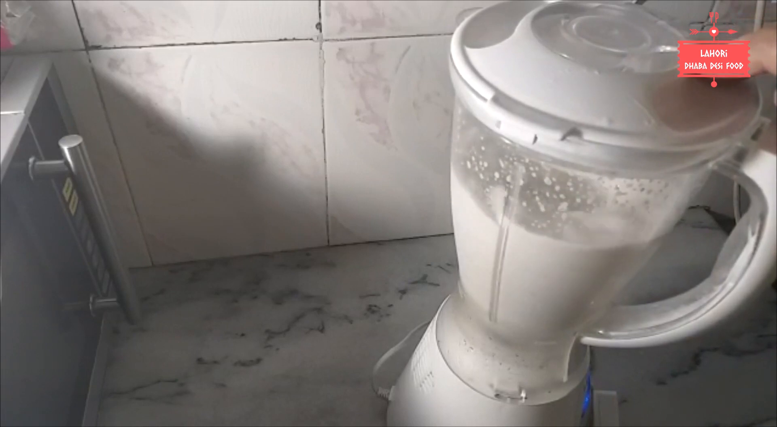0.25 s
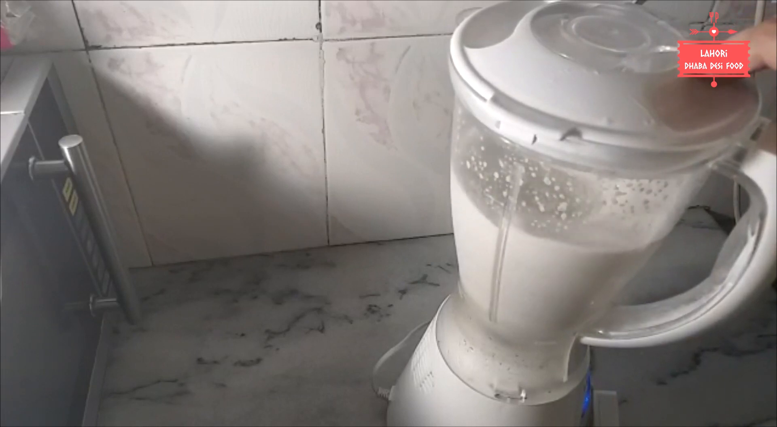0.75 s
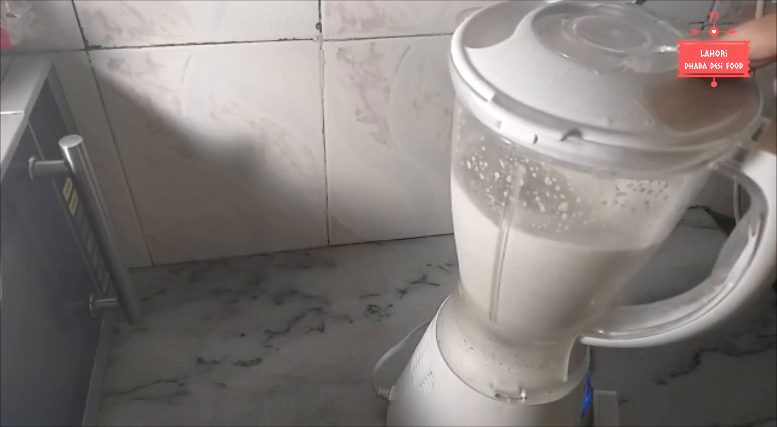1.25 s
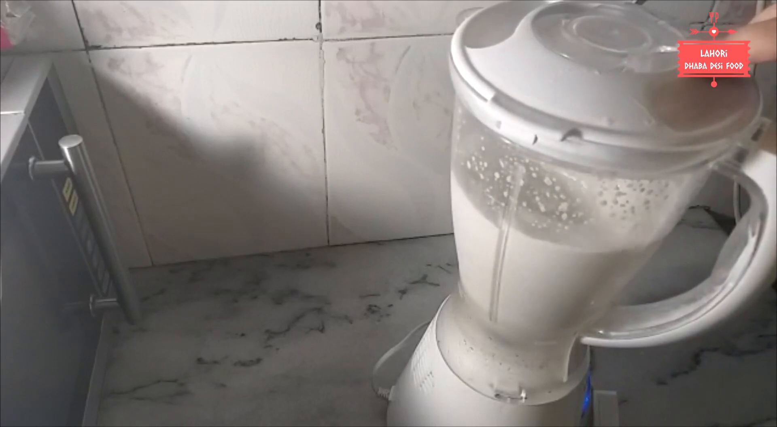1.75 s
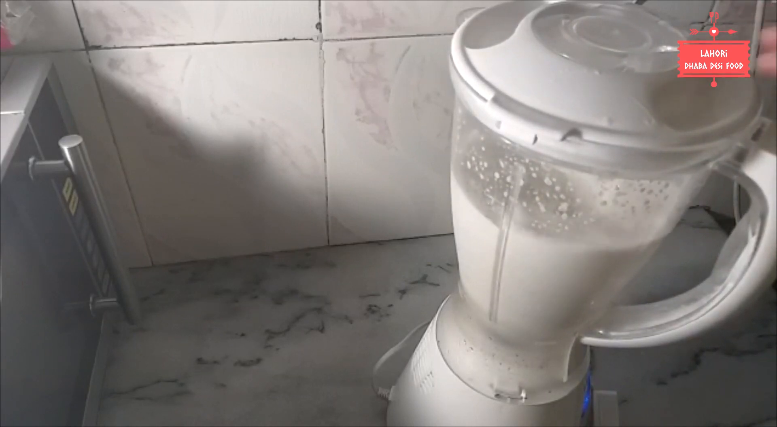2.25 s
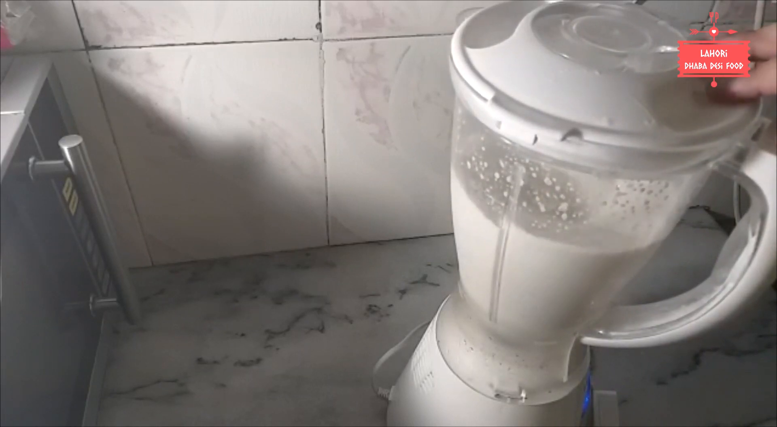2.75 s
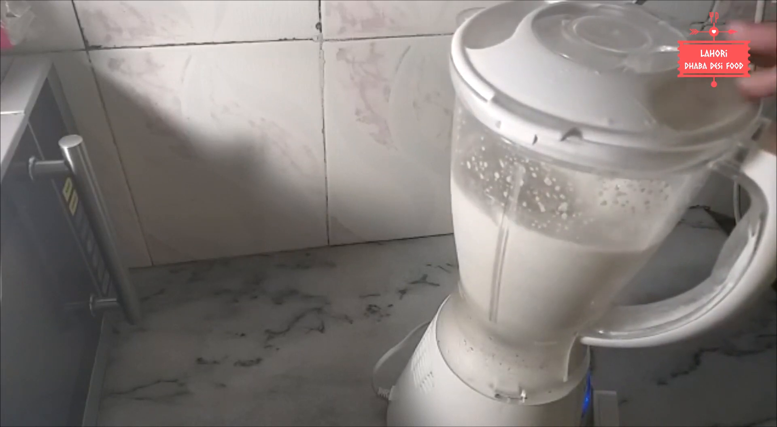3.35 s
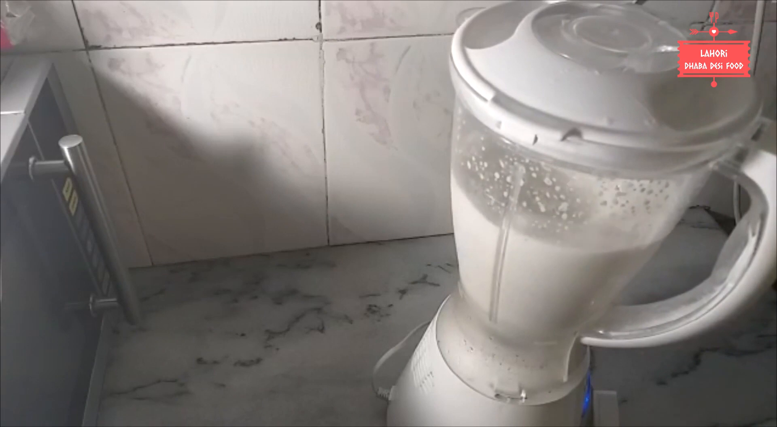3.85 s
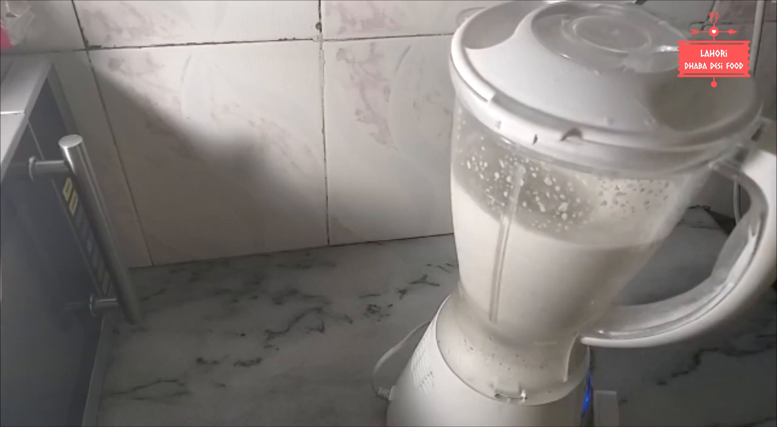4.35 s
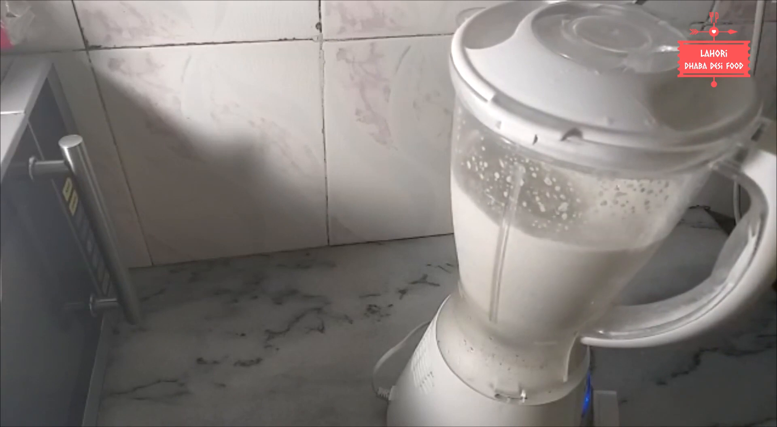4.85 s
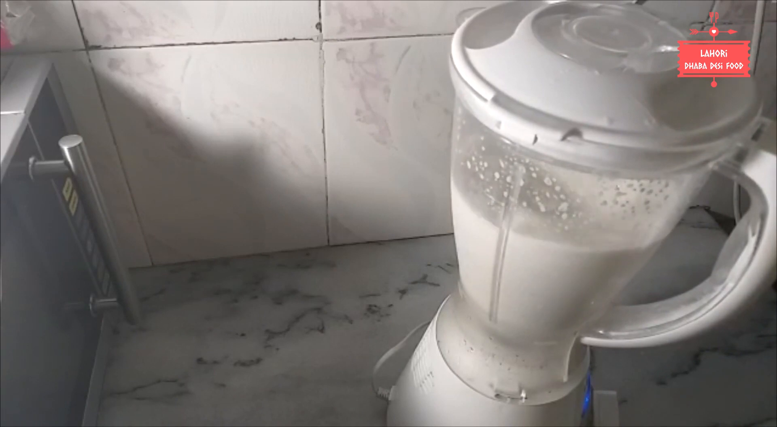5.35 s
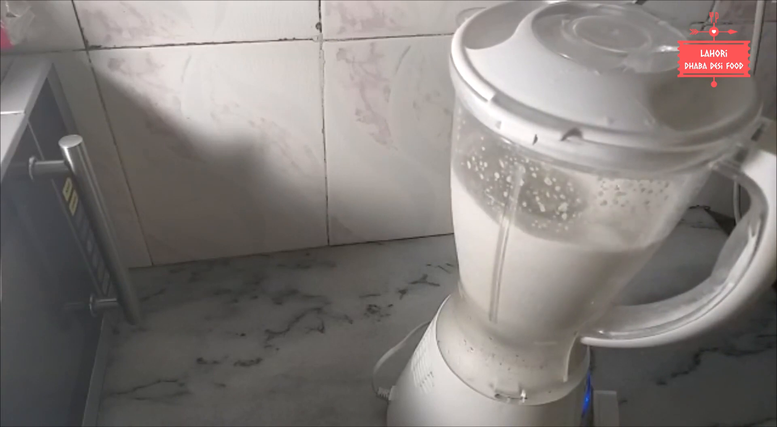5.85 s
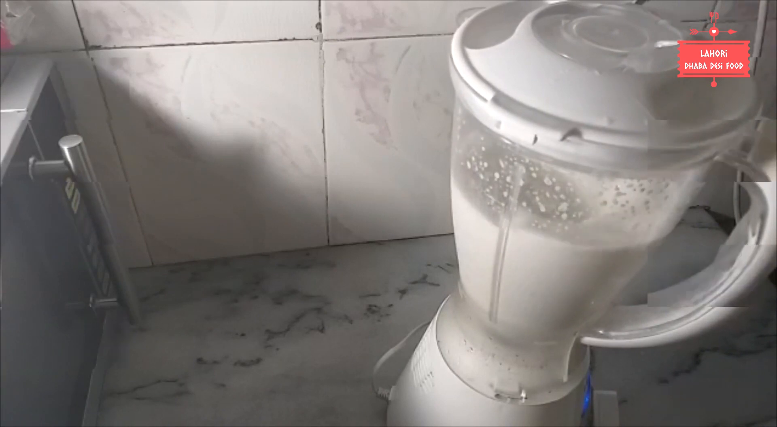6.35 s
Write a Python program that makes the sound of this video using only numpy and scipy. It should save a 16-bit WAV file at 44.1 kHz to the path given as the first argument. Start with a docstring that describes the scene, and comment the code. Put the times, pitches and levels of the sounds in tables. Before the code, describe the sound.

A kitchen blender runs at full speed, grinding ice and nuts in milk with a harsh, rattling roar over a steady motor hum.

```python
"""A countertop blender runs at full speed in a tiled kitchen, its blades grinding ice and nuts in milk.
The blades strike pieces in two bunches a turn: noise blows, coloured by the ringing plastic jar.
Clumps brake the shaft, which hums at about 300 turns a second; the vortex slaps the mixture onto the blades.
Under the grinding lie motor tones, hissing brushes and rushing milk; the tiles add a short tail."""
import sys
import numpy as np
from scipy import signal
from scipy.fft import rfft, irfft
from scipy.io import wavfile
from scipy.ndimage import uniform_filter1d, minimum_filter1d

SR = 44100
rng = np.random.default_rng(int(sys.argv[2]) if len(sys.argv) > 2 else 0)


def file_out(sig):
    """Save sig as 16-bit WAV at sys.argv[1]."""
    # one column per channel
    cols = np.atleast_2d(sig).T
    # limit, then scale
    lim = np.clip(cols, -1, 1)
    pcm = np.round(lim * 32767).astype(np.int16)
    wavfile.write(sys.argv[1], SR, pcm)


N = 290619
TIME = np.arange(N) / SR
BINS = np.fft.rfftfreq(8192, 1 / SR)


def amp(db):
    """Turns decibels into a gain."""
    return 10 ** (np.asarray(db) / 20)


def unit(x):
    """Scales to rms 1."""
    return x / np.sqrt(np.mean(x ** 2) + 1e-20)


def curves(rows):
    """Draws straight lines through a time table: one value a sample for each column."""
    s, *columns = np.transpose(rows)
    return [np.interp(TIME, s, column) for column in columns]


def spectrum(points):
    """Joins frequency and level points on a log-frequency axis."""
    hz, db = np.transpose(points)
    return np.interp(np.log(BINS + 1), np.log(hz), db)


def colour(x, gain_db):
    """Filters without looking ahead (minimum phase), so that blows ring after they land."""
    both_halves_db = np.r_[gain_db, gain_db[-2:0:-1]]
    log_gain = np.log(amp(np.maximum(both_halves_db, -100)))
    taps = np.fft.ifft(np.exp(np.conj(signal.hilbert(log_gain)))).real
    return signal.oaconvolve(x, taps[:len(taps) // 2])[:N]


def bell(hz, width, at=BINS):
    """Power response of one resonance: 1 at its centre, half at width / 2 to either side."""
    return 1 / (1 + (2 * (at - hz) / width) ** 2)


def wander(centre_hz, width_hz):
    """Random motion of rms 1 whose rates lie around centre_hz."""
    coarse = np.linspace(0, N / SR, N // 24)
    hz = np.fft.rfftfreq(len(coarse), coarse[1])
    rates = rfft(rng.standard_normal(len(coarse))) * np.exp(-((hz - centre_hz) / width_hz) ** 2)
    return np.interp(TIME, coarse, unit(irfft(rates, len(coarse))))


def blows(turns, spread=0.021, size_db=0.0, per_s=6500, knock=0.2, scatter=0.023):
    """Grit hits the blades in two bunches a turn, and the loose coupling knocks along with them."""
    # spread and scatter are in turns; size_db above 0 would make some grit larger
    def bunch(at):
        return np.exp((np.cos(2 * np.pi * (turns - at)) - 1) / (2 * np.pi * spread) ** 2)

    sizes = rng.standard_normal(N) * amp(size_db * np.minimum(rng.exponential(1, N), 3))
    hits = sizes * (rng.random(N) < per_s / SR)
    grit = unit(hits) + rng.standard_normal(N)
    grit *= 1 + 0.91 * bunch(0.471) + 0.5 * bunch(0.946)
    knocks = np.zeros(N)
    for at in (0.55, 0.97):
        passed = np.floor(np.maximum.accumulate(turns - at + scatter * wander(0, 120)))
        knocks += np.diff(passed, prepend=passed[0]) * amp(8 * wander(0, 90))
    return unit(grit) + knock * unit(knocks)


def crunch(per_s=70, decay_s=0.003, size=0.16):
    """Small pieces crack at random: the rattle jumps at once and dies away."""
    cracks = np.minimum(rng.exponential(1, N), 2.5) * (rng.random(N) < per_s / SR)
    dying = signal.lfilter([1], [1, -np.exp(-1 / (decay_s * SR))], cracks)
    return unit(1 + size * dying)


# As the mixture thickens, the low part of the rattle sinks against the high part.
BODY_DB_PER_S = -0.62


def shifting(x, swing_db, clump_db, patchy_db=1.02, steady_low=0.26, clump_low=1.0, split_hz=2300):
    """Pieces strike different places, so the colour keeps changing; slaps and clumps are mainly bright."""
    hz, s, z = signal.stft(x, SR, nperseg=256)
    patches = uniform_filter1d(rng.standard_normal(z.shape), size=5, axis=0)
    patches = unit(uniform_filter1d(patches, size=7, axis=1))
    low = 1 / (1 + (hz[:, None] / split_hz) ** 4)
    low_db = BODY_DB_PER_S * TIME - steady_low * swing_db - clump_low * clump_db
    low_db = np.interp(s, TIME, low_db - low_db.mean())
    gain = unit(amp(patchy_db * patches + low * low_db))
    return signal.istft(z * gain)[1][:N]


# Single large pieces, struck and knocking on the jar wall: t/s, level/dB (start of burst, before the jar)
CHUNKS = [(0.835, -10), (0.990, -11.5), (1.035, -14), (1.101, -12), (1.150, -14), (1.181, -12.5),
          (1.267, -14), (1.338, -15), (1.354, -15), (1.368, -14), (1.530, -13), (1.578, -11.5),
          (1.615, -15.5), (2.094, -16.5), (2.183, -19), (2.335, -18), (2.922, -17), (2.968, -10.5),
          (3.022, -17), (3.324, -14), (3.420, -12.5), (3.475, -13.5), (3.528, -15.5), (3.648, -15),
          (4.6215, -5.5), (5.591, -15)]
CHUNK_S = 0.006


def chunks():
    """A large piece shatters in a short burst of noise with a hard start."""
    out = np.zeros(N)
    for s, db in CHUNKS:
        on = (TIME > s) & (TIME < s + 4 * CHUNK_S)
        out[on] += amp(db) * np.exp(-((TIME[on] - s) / CHUNK_S) ** 2)
    return out * rng.standard_normal(N)


# Resonances of jar and housing: f/Hz, width/Hz, lift/dB
BODY = [(830, 17, 3.5), (894, 52, 11), (1092, 29, 4.5), (1202, 124, 9), (1459, 59, 9), (1670, 27, 7),
        (1920, 180, 3.5), (2023, 28, -5.5), (2436, 32, 2.5), (2640, 170, 4), (2759, 38, 4), (3020, 55, 4.5),
        (3340, 180, 1), (3590, 39, 7), (3800, 41, 1.5), (3930, 17, 9.5), (4140, 63, 4.5), (4270, 88, 4),
        (4690, 60, 6.5), (5000, 144, 5), (5420, 130, 4.5), (5730, 80, 6), (5920, 80, 5), (6370, 210, 5),
        (7950, 600, 14.5)]


def housing():
    """Lift in dB that the resonances of jar and housing give each frequency."""
    return sum(db * bell(hz, width) for hz, width, db in BODY)


# Colour of the grinding before the resonances: f/Hz, relative level/dB (per Hz)
GRIND_COLOUR = [(40, -81), (300, -40), (700, -28.5), (850, -9.5), (1400, -5.5), (2100, 2.5), (2450, -0.5),
                (3000, 0.5), (4300, 0), (5800, -3.5), (7000, -9.5), (10000, -43.5), (12700, -10.5),
                (14500, -19), (16000, -74)]
# Resonances of four ringing parts: f/Hz, width/Hz (before squaring steepens them), relative level/dB
LID_MODES = [(948, 18, 7), (1213, 58, 10)]
WALL_MODES = [(1758, 140, 4.5), (2047, 136, 4.5)]
COUPLING_MODES = [(3263, 310, 1.5), (3540, 150, -7), (4120, 410, -9.5)]
RASP_MODES = [(3250, 950, 3.5), (3900, 560, 9), (4880, 820, -1), (5630, 520, 6.5)]
# Singing of the machine, before trims and load:
# t/s, third shaft order level/dB, fourth shaft order level/dB, ringing lid level/dB
SINGING = [(0, -49, -48, -14), (0.11, -37, -31, -33), (0.17, -39, -32, -20), (0.22, -40, -30, -18),
           (0.31, -39, -41, -25), (0.4, -38.5, -32, -37), (0.6, -39, -36, -48), (0.72, -34, -28.5, -28),
           (0.9, -36, -36, -5), (1.9, -35, -33.5, -2.5), (2.65, -39, -31.5, -15), (3.25, -35, -34, -5),
           (3.8, -39, -28, -6), (4.2, -35, -35, 6.5), (4.6, -36.5, -27, -29), (5.0, -32.5, -31.5, -9),
           (5.7, -34.5, -30.5, 1.5), (5.95, -33, -29, 6), (6.4, -35.5, -23, -2.5), (6.59, -40.5, -27, 12.5)]
# Before trims and load: t/s, blade coupling's ring level/dB, upper rasp level/dB
COUPLING = [(0, -13, -20), (0.5, -18, -18), (0.8, -16, -15), (1.8, -9, -10), (2.8, -20, -19),
            (3.16, -14, -9), (3.4, -18, -18), (4.0, -9, -11.5), (4.8, -26, -20), (5.5, -21, -13),
            (5.73, -16, -9), (5.85, -18, -5), (5.96, -22, -3), (6.03, -35, -20), (6.59, -41, -13)]
CHUNK_WALL_DB = -9
RASP_PULSE = 0.45  # share of each slap by which the rasp swells beyond the rest of the rattle


def jar(rattle, bursts, effort_db, swing_db, body_db=0.5, lid_db=-12, wall_db=-10, wall_follow=0.05,
        coupling_db=5.5, coupling_follow=0.91, rasp_db=1.0, rasp_follow=0.56, drift_db=-0.5):
    """Blows ring the jar; wall, coupling and rasp swell with load; each ring's level wanders at random."""
    # each follow is in dB per dB of load; drift_db sets the size of the slow random wander
    def through(drive, gain_db):
        mean_power = np.mean(amp(gain_db) ** 2)
        return colour(drive, gain_db - 10 * np.log10(mean_power))

    def ring(drive, modes, db):
        own = drive * rng.choice([-1., 1.], N)  # each part is struck in its own way
        power = sum(amp(level) ** 2 * bell(hz, width) ** 2 for hz, width, level in modes)
        return amp(db + drift_db * wander(0, 0.91)) * through(own, 10 * np.log10(power))

    ring_db, upper_rasp_db = curves(COUPLING)
    rasp_swell_db = rasp_follow * effort_db + RASP_PULSE * (swing_db - swing_db.mean())
    out = amp(body_db) * through(rattle + bursts, spectrum(GRIND_COLOUR) + housing())
    out += ring(rattle, LID_MODES, lid_db + curves(SINGING)[2])
    out += ring(rattle, WALL_MODES, wall_db + wall_follow * effort_db)
    out += ring(bursts, WALL_MODES, CHUNK_WALL_DB)
    out += ring(rattle, COUPLING_MODES, coupling_db + ring_db + coupling_follow * effort_db)
    out += ring(rattle, RASP_MODES, rasp_db + upper_rasp_db + rasp_swell_db)
    return out


def spell(start, length, rise_s, fall_s):
    """Rises, holds and falls back: 0 to 1."""
    rise = (TIME - start) / rise_s
    fall = 1 - (TIME - start - length) / fall_s
    return np.clip(np.minimum(rise, fall), 0, 1)


# A trapped piece rings the jar: t/s, length/s, f/Hz, level/dB
CHATTER = [(0.10, 0.06, 3360, -26), (0.17, 0.075, 3300, -24.5), (0.36, 0.16, 1470, -32),
           (0.37, 0.05, 4110, -26.5), (0.643, 0.055, 1795, -18), (0.655, 0.02, 3290, -22),
           (0.685, 0.07, 2070, -25), (0.69, 0.05, 3520, -27), (0.774, 0.02, 1765, -14.5),
           (0.792, 0.017, 2075, -15.5), (0.824, 0.016, 1750, -19), (0.826, 0.03, 2040, -15.5),
           (0.86, 0.04, 3450, -24), (1.475, 0.085, 3400, -26), (2.245, 0.04, 3930, -28),
           (3.14, 0.025, 2060, -20.5), (3.468, 0.012, 1780, -21)]
CHATTER_RISE_S, CHATTER_FALL_S = 0.0067, 0.026


def chatter(smear=0.031):
    """A trapped piece chatters against the jar and rings it at one unsteady pitch."""
    shake = amp(1.5 * wander(0, 60))
    slip = smear * wander(0, 70)  # in cycles
    out = np.zeros(N)
    for s, length, hz, db in CHATTER:
        swell = spell(s, length, CHATTER_RISE_S, CHATTER_FALL_S)
        on = swell > 0
        tone = np.cos(2 * np.pi * (hz * TIME[on] + slip[on] + rng.random()))
        out[on] += np.sqrt(2) * amp(db) * swell[on] * tone
    return out * shake


# Treble colour shared by snaps and brushes: f/Hz, relative level/dB (per Hz)
BRUSH_COLOUR = [(3000, -42), (6000, -12), (7600, -6), (8700, -2), (9300, 20.5), (10200, 14.5), (10800, -2),
                (11400, 15.5), (12600, 6), (13500, -15.5), (14400, 2), (15700, 9), (16000, -4)]


def snaps(bursts):
    """Each shattering piece also snaps in the treble: bright noise follows the size of its burst."""
    bright = unit(colour(rng.standard_normal(N), spectrum(BRUSH_COLOUR)))
    return amp(-18.0) * bright * uniform_filter1d(abs(bursts), size=60)


# Clumps drawn into the blades and ground away: t/s, length/s, rise of the load level/dB
CLUMPS = [(0.086, 0.15, 5), (0.335, 0.094, 2.5), (0.643, 0.1, 5), (0.77, 0.14, 5), (1.227, 0.15, 4),
          (1.448, 0.11, 4.5), (1.861, 0.078, 3), (2.236, 0.04, 6.5), (2.723, 0.0561, 2), (3.062, 0.1, 5),
          (5.307, 0.048, 3.5), (6.238, 0.062, 4)]
CLUMP_RISE_S, CLUMP_FALL_S = 0.02, 0.035


def clumps():
    """Extra load in dB while clumps are on the blades."""
    return sum(db * spell(s, length, CLUMP_RISE_S, CLUMP_FALL_S) for s, length, db in CLUMPS)


# The wobbling vortex slaps the mixture onto the blades: t/s (peak), rise of the load level/dB
SLAPS = [(0.4642, 2), (0.5488, 2), (0.9941, 3), (1.0408, 2.5), (1.065, 3), (1.1058, 4.5), (1.123, 4),
         (1.1546, 6.5), (1.17, 3.5), (1.2698, 2), (1.583, 4), (1.735, 4.2), (1.8059, 4.3), (1.8448, 2),
         (1.8873, 4), (1.9746, 3.5), (2.0144, 6.5), (2.0552, 7.5), (2.0942, 5), (2.141, 5), (2.1811, 2),
         (2.308, 3), (2.3508, 2), (2.4864, 5.5), (2.5749, 3), (2.6279, 5.5), (2.67, 3), (2.7158, 2),
         (3.148, 2), (3.269, 5), (3.331, 6), (3.4224, 2), (3.4786, 5.5), (3.534, 6.5), (3.652, 4.5),
         (3.7003, 4), (3.8411, 2), (3.8911, 5.0), (3.9321, 4.5), (3.9692, 5.3), (4.0513, 2.5),
         (4.0912, 5.5), (4.1324, 3), (4.1682, 5), (4.208, 5), (4.2968, 4), (4.5706, 3.4), (5.525, 2.5),
         (5.5944, 3.5), (5.6433, 3.5), (5.684, 6.5), (5.724, 8), (5.768, 6.5), (5.812, 7), (5.855, 8.5),
         (5.894, 8.5), (5.9324, 7.5), (5.958, 6.5), (6.0081, 4), (6.0598, 3.2), (6.3732, 5), (6.412, 5),
         (6.451, 6), (6.5026, 5.5)]
SLAP_RISE_S, SLAP_FALL_S = 0.0038, 0.0102


def slaps(random_db=0.89):
    """Fast swing of the load in dB: the mixture slaps onto the blades and is thrown off more slowly."""
    swing_db = random_db * wander(28.2, 8.6)
    for s, db in SLAPS:
        age = TIME - s
        near = abs(age) < 0.1
        width_s = np.where(age[near] < 0, SLAP_RISE_S, SLAP_FALL_S)
        swing_db[near] += db * np.exp(-0.5 * (age[near] / width_s) ** 2)
    return swing_db


# Grinding between clumps and slaps: t/s, level/dB (before the jar)
LOAD = [(0.0, -20.5), (0.22, -20), (0.3, -21.5), (0.4, -20), (0.6, -20), (0.95, -21.5), (1.2, -24),
        (1.42, -23), (1.52, -23.5), (1.66, -24.5), (1.8, -22.5), (2.05, -27.5), (2.35, -24), (2.55, -25),
        (2.98, -19.5), (3.25, -22.5), (3.4, -20.5), (3.6, -23), (3.72, -22), (4.02, -22.5), (4.4, -22.5),
        (4.6, -20.5), (5.25, -20), (5.5, -17.5), (5.7, -21), (5.88, -22.5), (6.12, -19), (6.59, -21.5)]


def load(clump_db, swing_db):
    """Clumps and slaps add to the slow course of the grinding level, in dB."""
    return curves(LOAD)[0] + clump_db + swing_db


# Shaft turns per second with no clump or slap on the blades: t/s, f/Hz
SPEED = [(0.0, 304.87), (0.17, 307), (0.255, 287), (0.36, 296.37), (0.66, 304.97), (0.86, 299.11),
         (1.0, 301.65), (1.3, 301.63), (1.45, 306.16), (1.57, 298.72), (1.72, 301.14), (1.95, 297.76),
         (2.25, 304.17), (2.55, 306.6), (3.05, 306.6), (3.17, 303.98), (3.35, 305.27), (3.8, 306.17),
         (4.2, 298.72), (4.45, 306.51), (4.75, 309.28), (5.3, 310.03), (5.5, 300.09), (5.75, 302.38),
         (5.98, 297.7), (6.17, 308.04), (6.59, 307.5)]
SAG_HZ_PER_DB, INERTIA_S = 1.33, 0.1008  # a clump brakes the shaft, which answers late


def shaft(clump_db, swing_db, sag_hz=0.62):
    """Turns per second: clumps brake the shaft, and it slows a moment after each slap."""
    keep = np.exp(-1 / (INERTIA_S * SR))
    brake = SAG_HZ_PER_DB * signal.lfilter([1 - keep], [1, -keep], clump_db)
    drag = uniform_filter1d(swing_db, size=600) - uniform_filter1d(swing_db, size=5000)
    late_drag = np.roll(drag, round(0.013 * SR))
    return curves(SPEED)[0] - brake - sag_hz * late_drag


# Shaft's fundamental before the trim: t/s, level/dB
HUM = [(0, -32), (0.13, -35), (0.2, -42), (0.26, -29.5), (0.5, -28.5), (0.57, -35), (0.75, -33),
       (0.82, -36), (0.9, -30), (1.0, -31), (1.15, -34.5), (1.6, -32.5), (2.1, -35), (2.4, -39),
       (3.0, -27.5), (3.42, -34.5), (3.65, -31), (3.95, -33.5), (4.9, -29.5), (5.33, -30), (5.42, -40),
       (5.6, -30), (6.0, -31.5), (6.1, -34), (6.18, -41), (6.28, -32.5), (6.59, -36)]
# Weaker shaft orders before resonance and load: multiple of the shaft speed, level/dB
OVERTONES = [(5, -38), (6, -35.5), (7, -33.5), (8, -38), (9, -38), (10, -40), (11, -37.5), (12, -38),
             (13, -43), (14, -38.5), (18, -39), (24, -42.5)]
MAINS_HZ, MAINS_RIPPLE = 50, 0.12
# the third order fades when the speed sags below this resonance
HOUSING_HZ, HOUSING_WIDTH_HZ, HOUSING_LIFT_DB = 915.7, 51, 8
# the commutator is loudest near top speed
WHINE_DB, WHINE_HZ, WHINE_WIDTH_HZ, WHINE_LIFT_DB = -48, 14880, 200, 8
ORDER_SMEAR, WHINE_SMEAR = 0.12, 0.25  # play in the coupling smears upper orders and whine (cycles rms)
SIDE_TONE_DB, SIDE_TONE_WAVER_DB = -14, 3
SLAP_PRESS = 0.14  # share of each slap by which the upper orders swell


def motor(speed, turns, effort_db, swing_db, waver_db=1.5, rough=0.19, hum_trim_db=-1.15,
          field_db=-60, blade_follow=0.69, field_follow=0.93):
    """Shaft orders and commutator whine; the torque pulses at twice the mains rate."""
    mains = 2 * MAINS_HZ * TIME  # in cycles
    first_db = curves(HUM)[0] + hum_trim_db
    third_db, fourth_db, _ = curves(SINGING) + blade_follow * effort_db
    third_db = third_db + HOUSING_LIFT_DB * bell(HOUSING_HZ, HOUSING_WIDTH_HZ, at=3 * speed)

    def line(order, db, beat=0):
        return np.sqrt(2) * amp(db) * np.cos(2 * np.pi * (order * turns + beat + rng.random()))

    def side_tone(order, db, beat):
        return line(order, db + SIDE_TONE_WAVER_DB * wander(0, 12), beat)

    unbalance = line(order=1, db=first_db + 1.3 * wander(0, 22))
    blades = line(order=2, db=first_db - 16.5 + 3 * wander(0, 12))
    blades += line(order=3, db=third_db + waver_db * wander(0, 32))
    blades += line(order=4, db=fourth_db + waver_db * wander(0, 63))

    # an order swells when the speed carries it onto a resonance
    lifts_db = housing()
    upper = np.zeros(N)
    for order, db in OVERTONES:
        resonant_db = db + np.interp(order * speed, BINS, lifts_db)
        tone = line(order=round(order), db=resonant_db, beat=ORDER_SMEAR * wander(0, 53))
        upper += tone * (1 + rough * wander(0, 24))
    upper *= amp(0.71 * effort_db + SLAP_PRESS * (swing_db - swing_db.mean()))

    # the commutator whines twice for each of its 24 bars
    whine_db = WHINE_DB + WHINE_LIFT_DB * bell(WHINE_HZ, WHINE_WIDTH_HZ, at=48 * speed)
    whine = line(order=48, db=whine_db + 2 * wander(0, 20), beat=WHINE_SMEAR * wander(0, 110))

    # the pulsing field hums and puts side tones next to the low orders
    field = line(order=0, db=field_db + field_follow * effort_db + 3.2 * wander(0, 24), beat=mains)
    field += side_tone(order=2, db=-53, beat=-mains)
    field += side_tone(order=2, db=-52.5, beat=mains)
    field += side_tone(order=3, db=third_db + SIDE_TONE_DB, beat=-mains)
    for way in (-1, 1):
        field += side_tone(order=4, db=fourth_db + SIDE_TONE_DB, beat=way * mains)

    ripple = 1 + MAINS_RIPPLE * np.cos(2 * np.pi * mains)
    return unbalance + field + (blades + upper + whine) * ripple


def brushes(turns, effort_db, swing_db, level_db=-39, follow=1.0):
    """The carbon brushes hiss and spit, harder when the motor draws more current."""
    hiss = unit(colour(blows(turns), spectrum(BRUSH_COLOUR)))
    spit_db = 1.6 * wander(0, 90) + 1.4 * wander(6, 8) + 0.7 * (swing_db - swing_db.mean())
    return hiss * amp(level_db + follow * effort_db + spit_db)


# Colour of the rushing milk: f/Hz, relative level/dB (per Hz)
CHURN_COLOUR = [(20, -50), (55, -37), (85, -14), (125, -15), (160, -3), (225, -8), (290, 3.5), (340, 5.5),
                (460, -1.5), (620, 1.5), (760, -0.5), (850, 7.5), (1300, 6.5), (2500, -24.5)]


def liquid(effort_db, swing_db, level_db=-33.5, follow=0.66, thickening_db_per_s=0.4652):
    """The whirling milk rushes and gurgles under the grinding, louder as it thickens."""
    rush = unit(colour(rng.standard_normal(N), spectrum(CHURN_COLOUR)))
    gurgle_db = 1.33 * wander(0, 69)
    pressed_db = follow * effort_db + 0.13 * swing_db
    return rush * amp(level_db + thickening_db_per_s * TIME + pressed_db + gurgle_db)


# Colour of the side treble, mostly above 8 kHz: f/Hz, relative level/dB (per Hz)
SIDE_TREBLE_COLOUR = [(5500, -60), (7000, -55), (8000, -6), (8600, 4.5), (10800, 0.5), (12000, -1),
                      (16000, -21)]


def side_treble(turns, load_db):
    """Treble noise mostly above 8 kHz, opposite in left and right, swelling with the load."""
    noise = blows(turns)  # noise pulsing with the shaft
    return amp(load_db - 14.0) * unit(colour(noise, spectrum(SIDE_TREBLE_COLOUR)))


def kitchen(x, t60=0.15, wet_db=-15):
    """Tiles and counter throw back a short, dense tail, modelled as random fading echoes."""
    t = TIME[:SR // 3]
    echoes = rng.standard_normal(len(t)) * (rng.random(len(t)) < 3000 / SR)
    taps = echoes * (t > 0.002) * amp(-60 * t / t60)
    return x + amp(wet_db) * signal.oaconvolve(x, taps / np.linalg.norm(taps))[:N]


# Part of the middle that differs between left and right: f/Hz, level/dB (against the middle)
SIDE_COLOUR = [(300, -64), (600, -56), (800, -51), (1100, -79), (1500, -19.5), (2200, -13), (3000, -53),
               (5000, -70)]


def scene(flutter_hz=1.1):
    """The blender stands near the middle; treble noise is added with opposite signs left and right."""
    clump_db, swing_db = clumps(), slaps()
    load_db = load(clump_db, swing_db)
    effort_db = uniform_filter1d(load_db - load_db.mean(), size=2500)  # the load as the motor feels it
    speed = shaft(clump_db, swing_db)
    turns = np.cumsum(speed + flutter_hz * wander(0, 68.7)) / SR

    bursts = chunks()
    rattle = shifting(amp(load_db) * crunch() * blows(turns), swing_db, clump_db)
    mid = kitchen(jar(rattle, bursts, effort_db, swing_db)) + chatter() + snaps(bursts)
    mid += motor(speed, turns, effort_db, swing_db)
    mid += liquid(effort_db, swing_db)
    mid += brushes(turns, effort_db, swing_db)
    side = colour(mid, spectrum(SIDE_COLOUR)) + side_treble(turns, load_db)
    return np.array([mid + side, mid - side])


def record(dry):
    """A fast limiter holds down the highest peaks; then a low-pass filter limits the band."""
    headroom = np.minimum(1, 0.97 / (abs(dry).max(0) + 1e-9))
    gain = uniform_filter1d(minimum_filter1d(headroom, size=90), size=90)
    taps = signal.firwin(511, 16000, window=("kaiser", 9), fs=SR)  # edge in Hz
    return signal.oaconvolve(dry * gain, taps[None], "same")


dry = scene()
out = record(dry)
file_out(out)
```